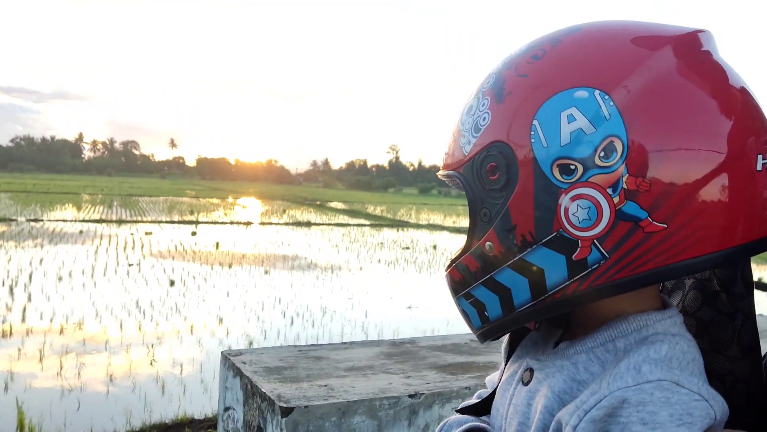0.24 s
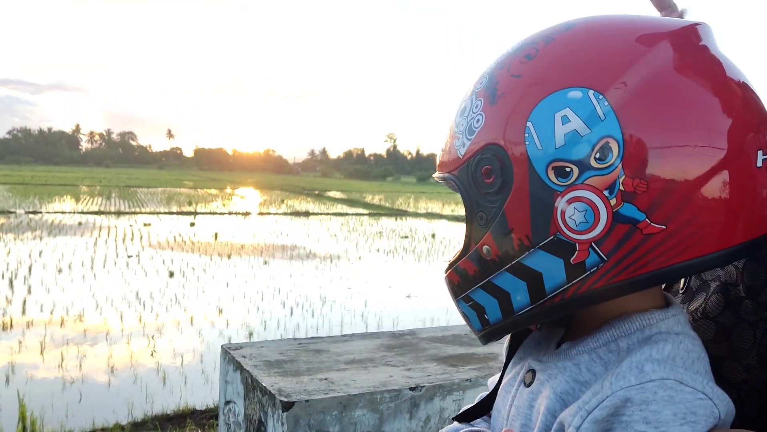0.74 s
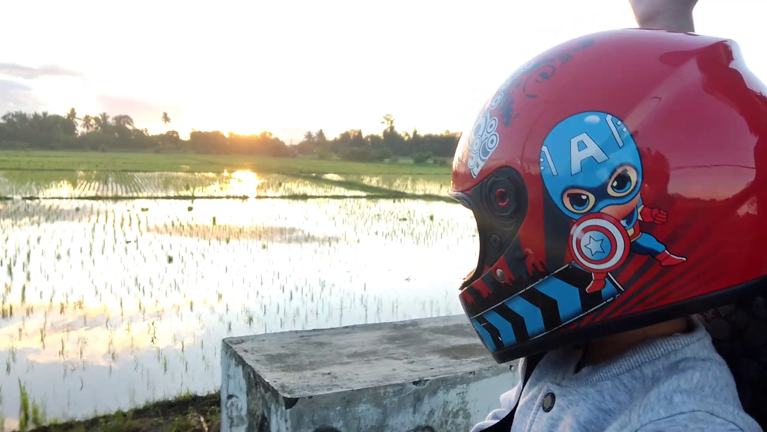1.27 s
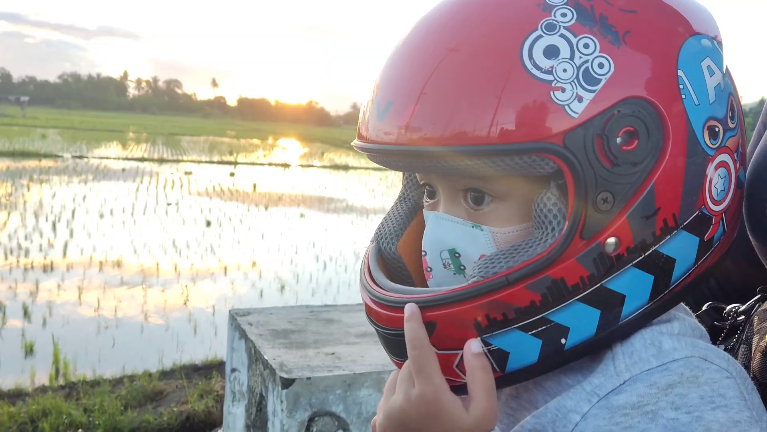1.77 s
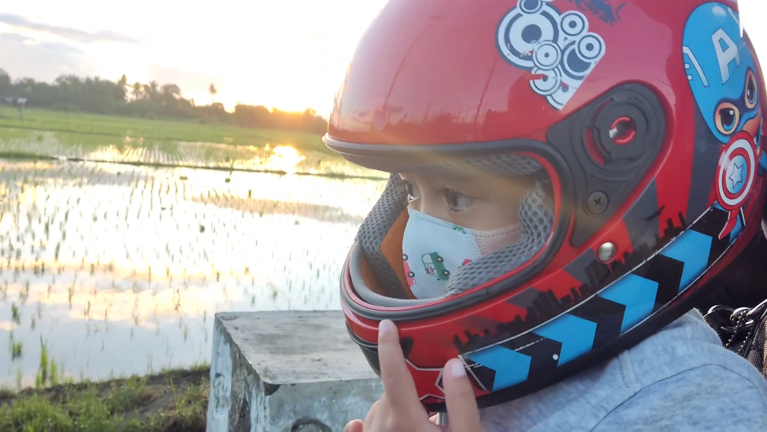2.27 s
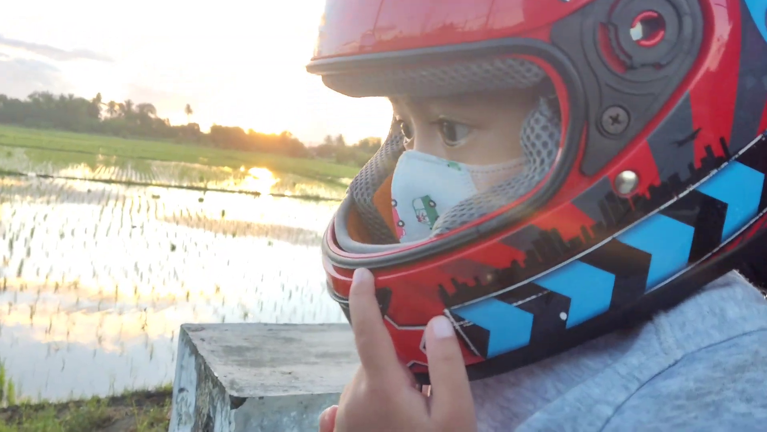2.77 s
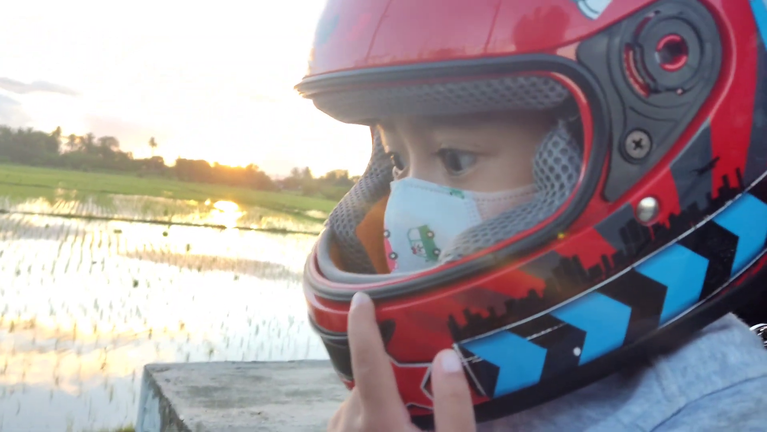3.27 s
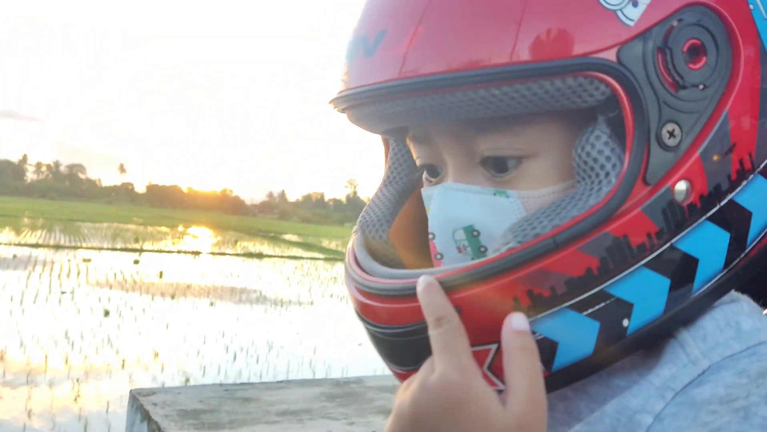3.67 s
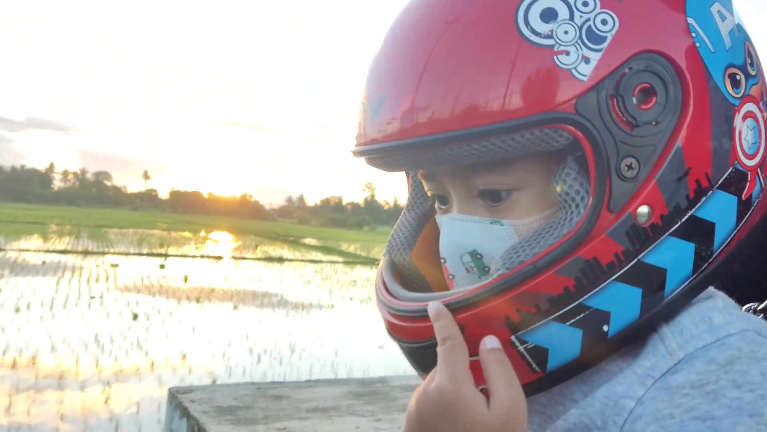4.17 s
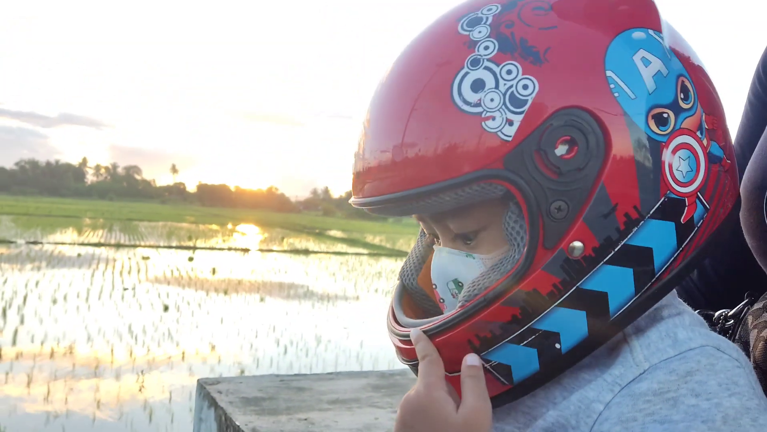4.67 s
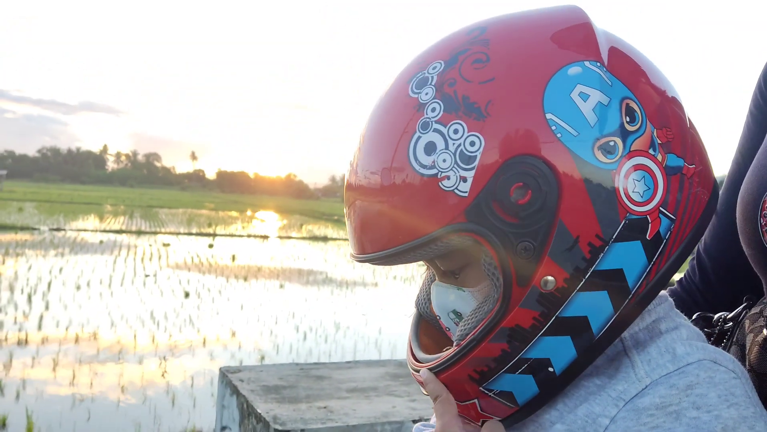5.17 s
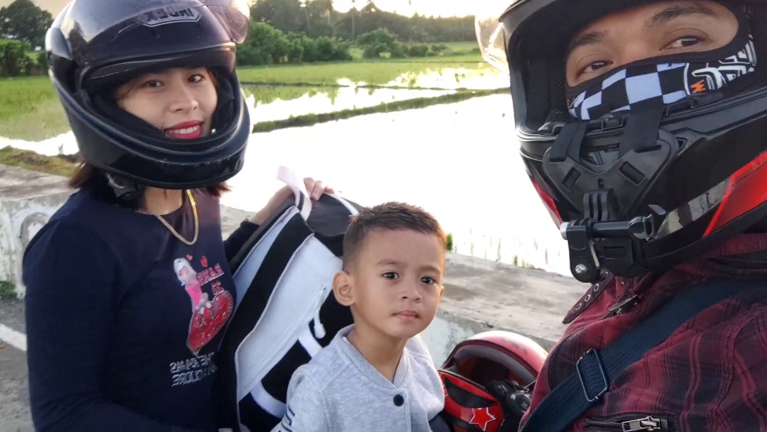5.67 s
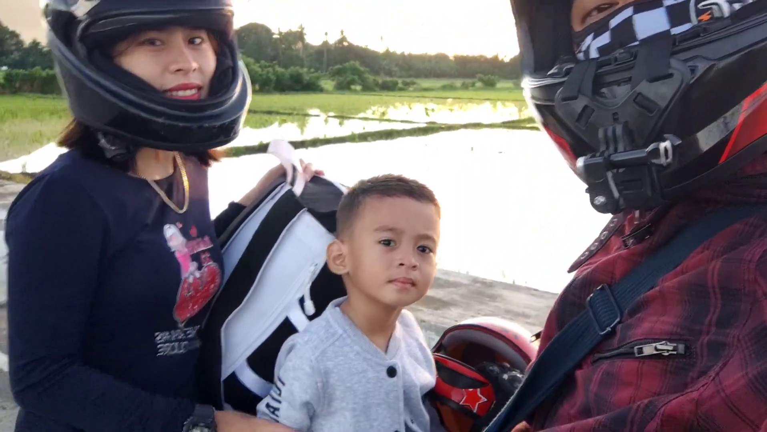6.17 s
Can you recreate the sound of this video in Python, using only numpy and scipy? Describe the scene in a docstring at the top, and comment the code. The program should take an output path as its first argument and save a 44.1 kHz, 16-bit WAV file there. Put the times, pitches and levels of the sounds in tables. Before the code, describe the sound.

Insects sing outdoors as a small engine runs steadily, a motorbike rides by with hissing tyres, and a far engine hums.

```python
"""Dusk on a road through rice paddies, in three parts; insects sing throughout, and a near bush cricket
through the first two. At the start a small one-cylinder engine is already droning, one exhaust puff per
firing, while small metal pieces jingle. After a click the second part fades in: something chirps once,
and a motorbike rides past from right to left on hissing tyres, its pitch dropping, while a second one
draws near behind it. After another click the last part fades in, with only far engines and insects."""
import sys
import numpy as np
from scipy import signal
from scipy.fft import rfft, irfft
from scipy.io import wavfile
from scipy.ndimage import uniform_filter1d

SR = 44100
rng = np.random.default_rng(int(sys.argv[2]) if len(sys.argv) > 2 else 0)


def wrap_up_sound(samples):
    """Save the sound to the file named by the first command line argument, as 16-bit audio."""
    columns = np.atleast_2d(samples).T
    # keep every value between -1 and 1, then stretch to whole-number steps
    tamed = np.clip(columns, -1, 1)
    steps = np.round(tamed * 32767).astype(np.int16)
    wavfile.write(sys.argv[1], SR, steps)


N = 283999
TIME = np.arange(N) / SR
BIN_HZ = np.fft.rfftfreq(1024, 1 / SR)[:, None]
MIC_GAP_S = 0.00052  # time sound takes from the left microphone to the right one

# The three parts. Each row: start in seconds, end in seconds.
PARTS = [(-1, 1.557), (1.594, 5.458), (5.496, 7)]
# A motorbike's tyre and engine noise from the front. Each row: pitch in Hz, left and right level in dB.
ROAR = [(30, -74, -74), (60, -69, -66), (106, -69, -65), (220, -60.5, -69), (327, -72.5, -72.5),
        (490, -71.5, -67.5), (660, -67, -67.5), (840, -73.5, -75), (1010, -68, -62), (1140, -79, -76.5),
        (1260, -72.5, -65), (1700, -68, -67), (1830, -76, -63), (2070, -69, -74), (3000, -72.5, -75),
        (3870, -70, -72.5), (4700, -77, -78), (6500, -80.5, -81), (11560, -73, -84), (14400, -101, -100)]


def amp(db):
    """Turns decibels into a number to multiply by."""
    return 10 ** (np.asarray(db) / 20)


def unit(x):
    """Scales a signal to an average size (rms) of 1."""
    return x / np.sqrt(np.mean(x ** 2) + 1e-20)


def curves(rows):
    """Joins a table's values by straight lines through time."""
    seconds, *columns = np.transpose(rows)
    return [np.interp(TIME, seconds, column) for column in columns]


def colour(rows):
    """Turns a table of pitches and levels into left and right gains for every pitch."""
    hz, *sides = np.transpose(rows)
    return amp([np.interp(np.log(BIN_HZ + 1), np.log(hz), side) for side in sides])


def wander(rate):
    """A smooth random wobble, with up to about this many changes a second."""
    hz = np.fft.rfftfreq(N, 1 / SR)
    return unit(irfft(rfft(rng.standard_normal(N)) * np.exp(-(hz / rate) ** 2), N))


def during(part):
    """1 while this part plays and just after, otherwise 0."""
    start, end = PARTS[part]
    return (TIME >= start) & (TIME < end + .03)


def delayed(x, seconds):
    """Makes both sides late by a delay that may change."""
    return np.array([np.interp(TIME - seconds, TIME, side) for side in x])


def noise(gain, bearing, direct, patchy_db):
    """Patchy noise: the direct share comes from a bearing (-1 left, +1 right), the rest from all round."""
    white = rng.standard_normal((3, N)) * np.sqrt(SR / 2)
    _, t, (source, left, other) = signal.stft(white, SR, nperseg=1024, noverlap=768)
    alike = np.sinc(2 * BIN_HZ * MIC_GAP_S)  # long waves reach both sides alike
    around = np.array([left, alike * left + np.sqrt(1 - alike ** 2) * other])
    shift = np.exp(1j * np.pi * BIN_HZ * MIC_GAP_S * np.interp(t, TIME, bearing * np.ones(N)))
    share = np.clip(direct / (1 + (BIN_HZ / 4200) ** 4), 0, 1)
    mix = np.sqrt(share) * np.array([source / shift, source * shift]) + np.sqrt(1 - share) * around
    patches = uniform_filter1d(rng.standard_normal(source.shape), size=3, axis=0)
    patches = unit(uniform_filter1d(patches, size=10, axis=1))
    return signal.istft(mix * gain * amp(patchy_db * patches), SR, nperseg=1024, noverlap=768)[1][:, :N]


def fuzzy_tone(hz, width_hz):
    """A narrow band of noise around a pitch, as complex numbers."""
    blur = wander(width_hz) + 1j * wander(width_hz)
    return blur * np.exp(2j * np.pi * np.cumsum(hz * np.ones(N)) / SR)


def from_bearing(tone, hz, bearing):
    """Places a complex tone left or right: it reaches the nearer microphone first."""
    return np.array([(tone * np.exp(1j * np.pi * side * hz * MIC_GAP_S * bearing)).real
                     for side in (-1, 1)])


def firings(hz, unsteady):
    """Counts the firings of an engine whose speed wavers a little."""
    return np.cumsum(hz * (1 + unsteady * wander(rate=12.3))) / SR


def exhaust(turns, tones, lag, rough, limp=0):
    """One puff per firing. The left is lag firings late; rough varies the force, limp alternates it."""
    multiples, levels_db = np.transpose(tones)
    shape_db = np.interp(abs(np.fft.fftfreq(128, 1 / 128)), multiples, levels_db)
    phase = -signal.hilbert(np.log(amp(shape_db))).imag  # each puff starts sharply, then dies away
    count = np.arange(int(turns[-1]) + 2)
    force = 1 + np.interp(turns, count, rough * rng.standard_normal(len(count)) + limp * (-1) ** count)
    cycle = np.linspace(0, 1, 1025)
    puff = unit(sum(amp(db) * np.cos(2 * np.pi * multiple * cycle + phase[int(multiple)])
                    for multiple, db in zip(multiples, levels_db)))
    return force * np.array([np.interp((turns + side * lag / 2) % 1, cycle, puff) for side in (-1, 1)])


def background_gain(column):
    """Turns one background sound up or down for each part."""
    # One row per part. Each row: level change in dB for the open air, the insect chorus, the cricket.
    changes = [(-0.5, 2.5, -5.5), (1, 3.5, -7), (0, -1, -35)]
    return sum(amp(row[column]) * during(part) for part, row in enumerate(changes))


def paddies():
    """Far traffic murmurs in the open air, and many insects blend into a high chorus."""
    # Open air with far traffic. Each row: pitch in Hz, left and right level in dB.
    open_air = [(10, -80, -59), (25, -65, -76), (55, -69, -81), (107, -65, -62.5), (190, -72.5, -75),
                (350, -74.5, -72.5), (573, -75, -74), (975, -78.5, -78), (1220, -81, -83.5),
                (1580, -87, -86), (1850, -82, -85), (2250, -88, -86.5), (3720, -86, -90),
                (4900, -88.5, -92), (6000, -100, -97), (12000, -110, -110)]
    # The insects' song. Each row: pitch in Hz, width in Hz, left and right level in dB.
    insect_bands = [(7250, 254, -82.5, -80.5), (8950, 480, -87.5, -76), (10200, 410, -82.5, -85.5)]
    power = sum(amp(sides)[:, None, None] ** 2 * np.exp(-.5 * ((BIN_HZ - hz) / width) ** 2)
                for hz, width, *sides in insect_bands)
    chorus = noise(np.sqrt(power), bearing=0, direct=0, patchy_db=2.5) * amp(wander(rate=110))
    air = noise(colour(open_air), bearing=0.72, direct=0.9, patchy_db=1.5)
    return air * background_gain(column=0) + chorus * background_gain(column=1)


def cricket(ring_hz=8950, strokes_per_s=120, stroke_width=0.21, sag_hz=300):
    """A bush cricket on the right: uneven strokes make its wing ring, the pitch sagging in each one."""
    # How its song swells. Each row: time in seconds, relative level in dB.
    loudness = [(1.85, -33), (1.87, -36), (3.4, -30), (3.47, -37), (4.0, -35)]
    turns = np.cumsum(strokes_per_s * (1 + 0.052 * wander(rate=39))) / SR
    within = turns % 1 - .5
    force_db = 2.2 * rng.standard_normal(N)[turns.astype(int)]
    strokes = np.exp(-.5 * (within / stroke_width) ** 2) * amp(force_db)
    singing = np.clip((wander(rate=20) + 2) * 2, 0, 1)  # rare pauses
    throb = 1 + 0.2 * np.sin(2 * np.pi * 18.2 * TIME)
    wing = np.sin(2 * np.pi * np.cumsum(ring_hz - sag_hz * within + 110 * wander(rate=900)) / SR)
    song = unit(strokes * singing * throb * wing) * amp(curves(loudness)[0])
    return song * background_gain(column=2) * amp([[-20], [3]])


def chirp(at_s=2.73, half_length_s=0.035):
    """One short, high chirp on the left, probably a small bird."""
    swell = np.exp(-((TIME - at_s) / half_length_s) ** 2)
    return fuzzy_tone(hz=5600, width_hz=90).real * swell * amp([[-49], [-61]])


def far_engine(hz=53.8, bearing=0.87):
    """An engine far up the road: only its low exhaust tones carry this far."""
    # Its exhaust. Each row: multiple of the firing rate, relative level in dB.
    tones = [(1, 4.5), (2, 0), (3, 3), (4, -10), (5, 0), (6, -3.5), (7, -3.5)]
    turns = firings(hz, unsteady=0.0042)
    return exhaust(turns, tones, lag=bearing * MIC_GAP_S * hz, rough=0.36) * amp(-47.5)


def jingles(spread_hz=400, tone_count=9, rise_s=0.01, ring_s=0.11):
    """Each touch of metal rings a cluster of very high tones, which flutter as the pieces chatter."""
    # The touches. Each row: start in seconds, strength in dB, middle pitch in Hz.
    touches = [(.04, -46, 13300), (.115, -44, 13100), (.32, -37, 13300), (.4, -41, 13800),
               (0.504, -24, 13100), (.55, -36, 13800), (.7, -27.5, 13000), (.76, -34, 13200),
               (.797, -28, 13100), (.88, -33, 13300), (.96, -36, 13100), (1.02, -44, 13200),
               (1.429, -23, 13100)]
    out, t = np.zeros(N), np.arange(SR // 4) / SR
    for start, db, hz in touches:
        offsets = rng.standard_normal(tone_count)
        ring = sum(np.sin(2 * np.pi * (hz + spread_hz * offset) * t + offset * np.pi)
                   for offset in offsets)
        swell = amp(db - 60 * t / ring_s) * (1 - np.exp(-t / rise_s)) ** 2
        first = round(start * SR)
        out[first:first + len(t)] += unit(ring) * swell
    chatter = unit(amp(5 * wander(rate=450)))
    return out * chatter * amp([[3.5], [-8]])


def casing(turns, scatter=0.85, bearing=0.77, rattle=0.059):
    """Each firing knocks the engine's casing, never twice alike, and loose parts rattle it in between."""
    # The casing's ringing tones. Each row: pitch in Hz, width in Hz, left and right level in dB.
    tones = [(1377, 74, -51.5, -46.5), (2293, 115, -45, -57)]
    chance = rng.standard_normal(N) + 1j * rng.standard_normal(N)
    knocks = np.diff(np.floor(turns), prepend=0) * (1 + scatter * chance) + rattle * chance
    out = np.zeros((2, N))
    for hz, width_hz, *sides in tones:
        pole = np.exp((2j * np.pi * hz - np.pi * width_hz) / SR)
        ring = signal.lfilter([1], np.poly([pole, pole]), knocks)
        out += unit(from_bearing(ring, hz, bearing)) * amp(sides)[:, None]
    return out


def droning_engine(hz=46.06):
    """A steady engine on the right: exhaust puffs, clatter that swells with each firing, a ringing case."""
    # Its loudness. Each row: time in seconds, level in dB.
    loudness = [(0, -30.5), (.5, -30.5), (.9, -31), (1.55, -33.5)]
    # Its exhaust. Each row: multiple of the firing rate, relative level in dB.
    tones = [(1, -11), (2, -8), (3, -4.5), (4, -16), (5, -20.5), (6, 3.5), (7, 2.5), (8, -5.5), (9, 5),
             (10, 6.5), (11, -4.5), (12, -4.5), (13, 2), (14, 4.5), (15, -18), (16, -31), (17, -17.5),
             (18, -11), (19, -18.5), (20, -6.5), (21, -8), (22, -7.5), (23, -16), (24, -18)]
    # Its moving parts. Each row: pitch in Hz, left and right level in dB.
    clatter_levels = [(60, -74, -77), (130, -66, -65), (211, -82, -93), (375, -66.5, -57),
                      (700, -73, -65.5), (1025, -63.5, -82), (1190, -88, -99), (1690, -101, -98),
                      (1810, -75, -77), (1920, -74.5, -77.5), (2700, -82, -79.5), (3000, -79, -101),
                      (3500, -79, -87), (4130, -81.5, -78.5), (4770, -85.5, -94), (6100, -81, -87),
                      (11300, -89, -105), (12700, -104, -112)]
    db, = curves(loudness)
    turns = firings(hz, unsteady=.0015)
    pipe = exhaust(turns, tones, lag=0.61 * MIC_GAP_S * hz, rough=0.024, limp=0.03)
    pipe *= amp(db) * amp([[-.6], [2]])
    beat = unit(1 + np.exp(-(turns % 1) / 2.5))
    clatter = noise(colour(clatter_levels), bearing=0.76, direct=0.98, patchy_db=1.5)
    return pipe + clatter * beat * amp(db - db.mean() - 2.5) + casing(turns) * amp(-0.3)


def second_bike(bearing=0.96, final_distance_m=8.3, speed_m_per_s=11.9):
    """A bike closing in from the right: its pitch creeps up while exhaust and tyres grow louder."""
    # Its engine speed. Each row: time in seconds, firings per second.
    firing_rate = [(2.5, 36.6), (4.2, 37.3), (5.45, 37.8)]
    # Its exhaust. Each row: multiple of the firing rate, relative level in dB.
    tones = [(1, 1.5), (2, 8.5), (3, 7.5), (4, 0.5), (5, -7.5), (6, -14.5), (7, 5), (8, -13), (9, 2),
             (10, 9), (11, 0.5), (12, 3), (13, 1.5), (14, 2), (15, -5.5)]
    seconds_left = np.maximum(PARTS[1][1] - TIME, 0)
    nearness = final_distance_m / (final_distance_m + speed_m_per_s * seconds_left)
    hz, = curves(firing_rate)
    turns = firings(hz, unsteady=0.0042)
    pipe = exhaust(turns, tones, lag=bearing * MIC_GAP_S * hz, rough=0.14) * amp(-30)
    tyres = noise(colour(ROAR), bearing, direct=0.91, patchy_db=1) * amp(-6.5)
    return (pipe + tyres) * nearness


BIKE_M_PER_S, SOUND_M_PER_S = 12.7, 343


def ride(nearest_s=3.97, nearest_m=6.4):
    """The passing bike: metres past us, nearness (up to 1), approach (+1 coming, -1 going), bearing."""
    # Its direction. Each row: time in seconds, bearing from -1 (left) to +1 (right).
    bearings = [(1.7, 0.64), (2.8, 0.61), (3.3, 0.3), (3.8, 0.23), (4.0, -0.85), (4.3, -0.74), (4.7, -0.97),
                (5.45, -0.99)]
    past_m = BIKE_M_PER_S * (TIME - nearest_s)
    distance_m = np.hypot(past_m, nearest_m)
    return past_m, nearest_m / distance_m, -past_m / distance_m, curves(bearings)[0]


def road_echo(x, lowest_hz=340, hz_per_m=130, longest_at_m=3.8):
    """The road's dull echo cancels some pitches; these gaps sweep down as the bike passes, then up."""
    past_m, nearness, approach, _ = ride()
    strength = 0.5 * nearness * np.clip(1.3 + approach, .4, 1.3)
    first_gap_hz = np.hypot(lowest_hz, hz_per_m * (past_m - longest_at_m))
    dull = signal.filtfilt(*signal.butter(2, 4500, fs=SR), x)
    return x + strength * delayed(dull, .5 / first_gap_hz)


def shade_middle(x, edges_hz=(510, 2450)):
    """The middle pitches of the bike's noise swell and dip on each side as it crosses in front."""
    # The swells and dips. Each row: time in seconds, left and right change in dB.
    changes = [(2.7, 5.5, 4), (3.1, 3.5, 8), (3.45, 0, 7), (3.72, 3.5, 1), (4.0, 3, -6), (4.2, 1.5, -5),
               (4.38, -0.5, -2.5), (4.6, 3.5, 3), (5.4, -2, -0.5)]
    middle = signal.sosfiltfilt(signal.butter(2, edges_hz, "bandpass", fs=SR, output="sos"), x)
    return x + middle * (amp(curves(changes)) - 1)


def bike_exhaust(firing_hz=48.9, wall_echo_s=0.00835, longest_at_m=3.74, wall_stretch_m=7.5):
    """The pitch drops and the pipe turns to us as it passes; a wall's echo lifts and cancels its tones."""
    # The exhaust from the front and from behind. Each row: multiple of the firing rate, level in dB.
    front_tones = [(1, -3), (2, 1.5), (3, 1), (4, -4), (5, -2.5), (6, -14.5), (7, -32), (8, -20.5),
                   (9, -14), (10, -19.5), (11, -16), (12, -10.5)]
    rear_tones = [(1, 1.5), (2, 4.5), (3, -4.5), (4, 0.5), (5, 0.5), (6, -4.5), (7, -6.5), (8, -8.5),
                  (9, -4), (10, -12), (11, -26.5), (12, -10), (13, -24), (14, -18.5)]
    past_m, nearness, approach, bearing = ride()
    hz = firing_hz / (1 - approach * BIKE_M_PER_S / SOUND_M_PER_S)
    turns = firings(hz, unsteady=.003 + .005 * np.maximum(-approach, 0))
    lag = bearing * MIC_GAP_S * hz
    front = exhaust(turns, front_tones, lag, rough=.06)
    rear = exhaust(turns, rear_tones, lag, rough=.14)
    pipe = front + (rear - front) * (1 - approach) / 2
    echo_s = wall_echo_s / np.hypot(1, (past_m - longest_at_m) / wall_stretch_m)
    pipe = pipe + 0.52 * delayed(pipe, echo_s)
    return pipe * nearness ** 0.79 * amp(-28.5 - 3 * approach), turns


def tyre_whoosh(behind, front_hz=1821, nearest_hz=679, rear_hz=1100):
    """The tyres' whoosh swells and dips in pitch just as the bike goes by."""
    _, nearness, _, bearing = ride()
    far_hz = front_hz + (rear_hz - front_hz) * behind
    hz = far_hz + (nearest_hz - far_hz) * nearness ** 6.5
    whoosh = from_bearing(fuzzy_tone(hz, width_hz=600), hz, bearing)
    return whoosh * amp(-34 - 1.5 * behind) * nearness ** 1.5


def motorbike(rear_view_m=1.282, blend_m=1.92, flare_db=3.8, flare_at_m=3.7, flare_width_m=2.6):
    """The passing bike: exhaust, tyre whoosh, a roar thrown forwards and a hiss thrown backwards."""
    # Tyre and engine noise from behind. Each row: pitch in Hz, left and right level in dB.
    hiss_levels = [(30, -71, -72), (65, -61, -64), (150, -64, -67), (250, -58, -65), (418, -61, -69),
                   (694, -66, -62.5), (1420, -65.5, -65), (2640, -73, -75.5), (3400, -67.5, -72.5),
                   (4300, -76, -76.5), (6400, -73, -78.5), (8600, -72, -70.5), (10200, -72.5, -75.5),
                   (11000, -64.5, -93), (12550, -70.5, -82), (14400, -74.5, -99)]
    past_m, nearness, _, bearing = ride()
    pipe, turns = bike_exhaust()
    behind = .5 + .5 * np.tanh((past_m - rear_view_m) / blend_m)  # 0 = we hear its front, 1 = its rear
    roar = noise(colour(ROAR), bearing, direct=0.78, patchy_db=2.8)
    roar *= amp(-0.2 - 6.3 * behind) * nearness ** 0.89
    # The hiss flares as the rear wheel and pipe swing into view; beamed backwards, it fades slowly.
    flare = amp(flare_db * np.exp(-((past_m - flare_at_m) / flare_width_m) ** 2))
    hiss = noise(colour(hiss_levels), bearing, direct=0.57, patchy_db=2.8)
    hiss *= amp(-16.5 + 16.97 * behind) * flare * nearness ** 0.45
    throb = unit(1 + 0.046 * np.cos(2 * np.pi * turns))
    return pipe + tyre_whoosh(behind) + shade_middle(road_echo(roar + hiss)) * throb


def scene():
    """Adds up all the sources, each engine in its own part."""
    bikes = (motorbike() + second_bike()) * during(part=1)
    far = far_engine() * during(part=2)
    drone = droning_engine() * during(part=0)
    return drone + bikes + far + paddies() + cricket() + chirp() + jingles()


def clicks(rise_s=0.00013):
    """A tiny one-sided blip of pressure ends each of the first two parts."""
    # The blips. Each row: start in seconds, height (1 is full scale).
    blips = [(1.5557, -0.19), (5.454, -0.21)]
    out = np.zeros(N)
    for start, height in blips:
        age = np.maximum(TIME - start, 0) / rise_s
        out += height * age * np.exp(1 - age)
    return out


def record(dry, fade_in_s=0.27, fade_out_s=0.0039, lowest_hz=35, highest_hz=14270):
    """Trims deep rumble and top treble; between parts the sound stops with a click, then fades back in."""
    lean = signal.sosfilt(signal.butter(4, lowest_hz, "highpass", fs=SR, output="sos"), dry)
    fade = np.zeros(N)
    for start, end in PARTS:
        rise = np.clip((TIME - start) / fade_in_s, 0, 1) ** 0.69
        fade += rise * np.exp(-np.maximum(TIME - end, 0) / fade_out_s)
    low_pass = signal.firwin(601, highest_hz, window=("kaiser", 9), fs=SR)
    return signal.oaconvolve(lean * fade + clicks(), low_pass[None], "same", axes=1)


dry = scene()
out = record(dry)
wrap_up_sound(out)
```